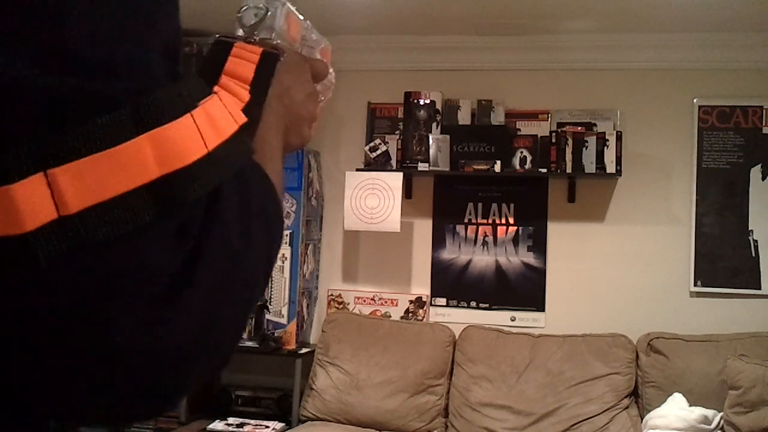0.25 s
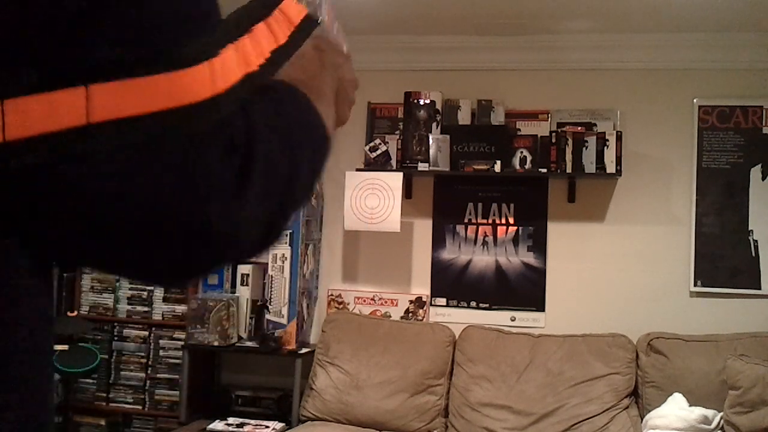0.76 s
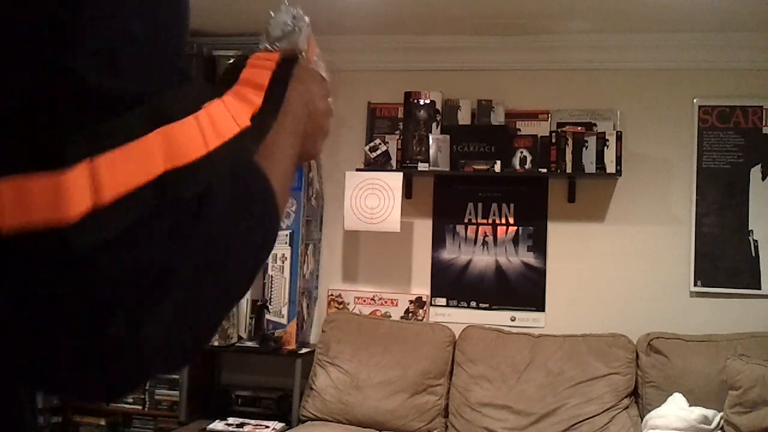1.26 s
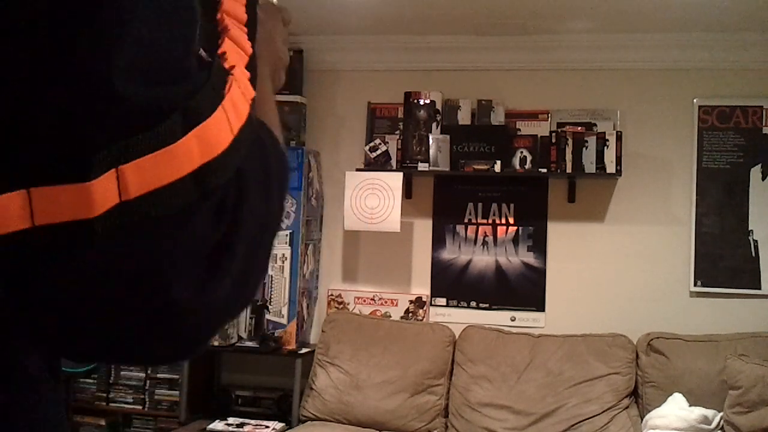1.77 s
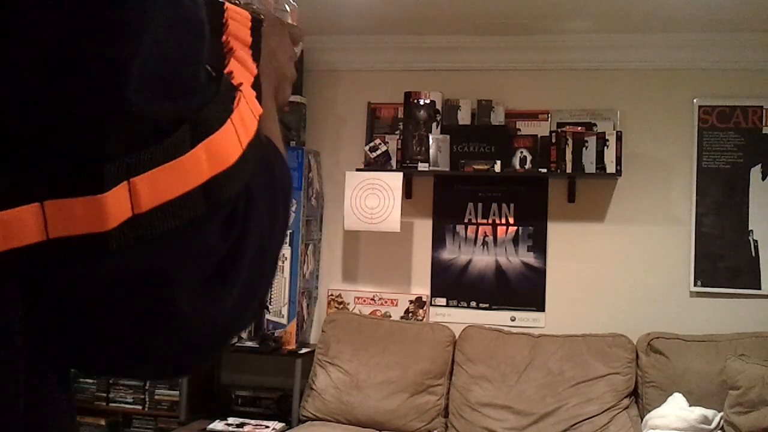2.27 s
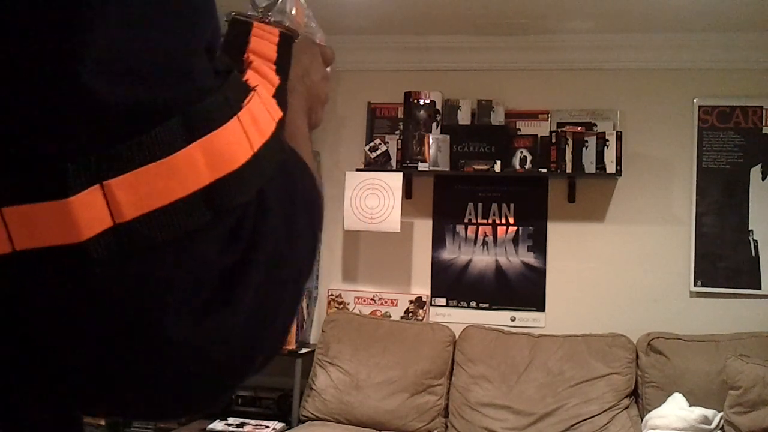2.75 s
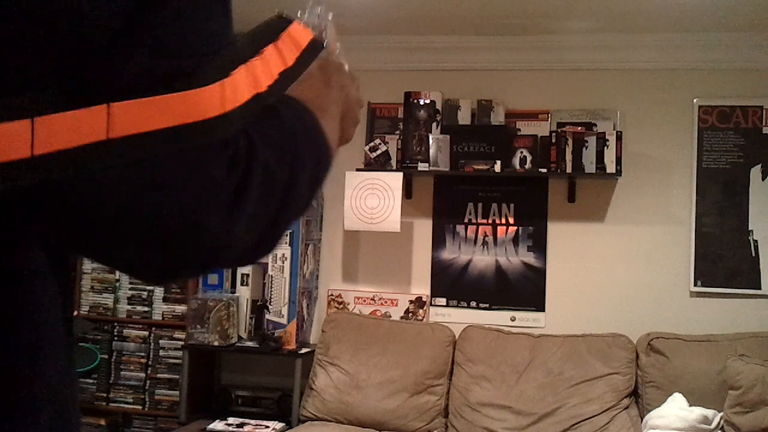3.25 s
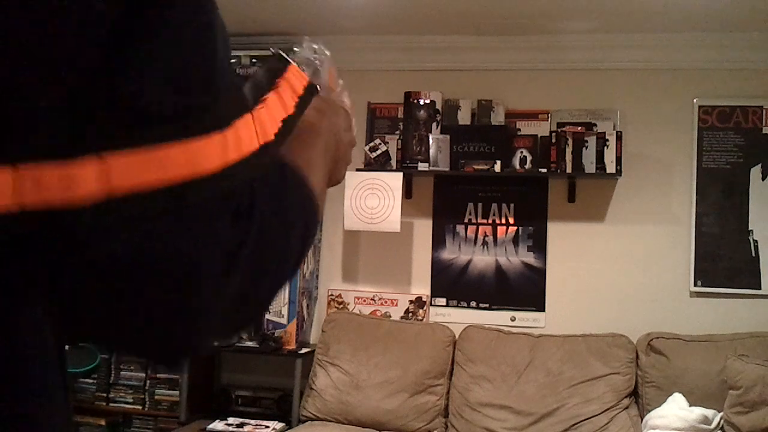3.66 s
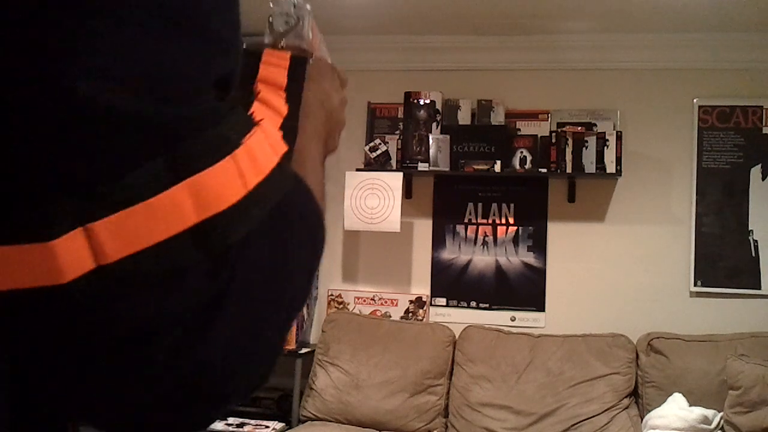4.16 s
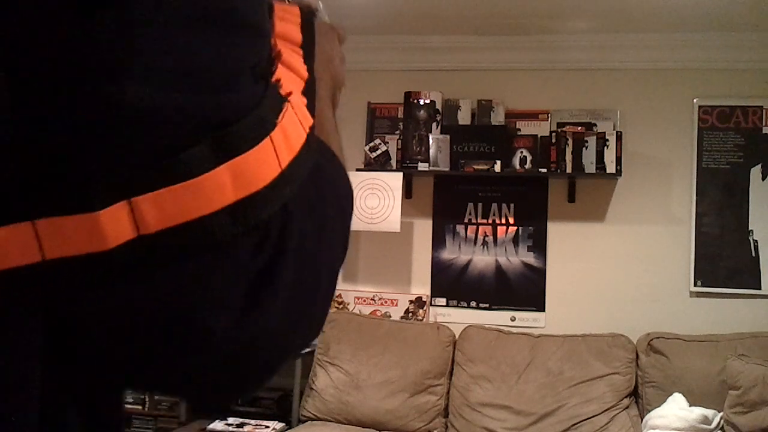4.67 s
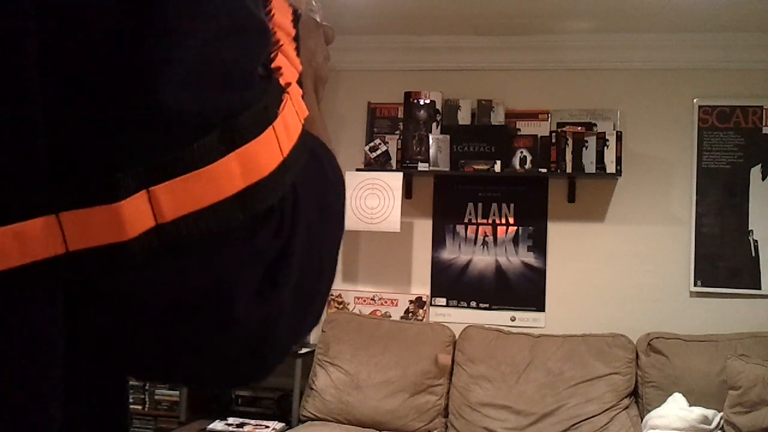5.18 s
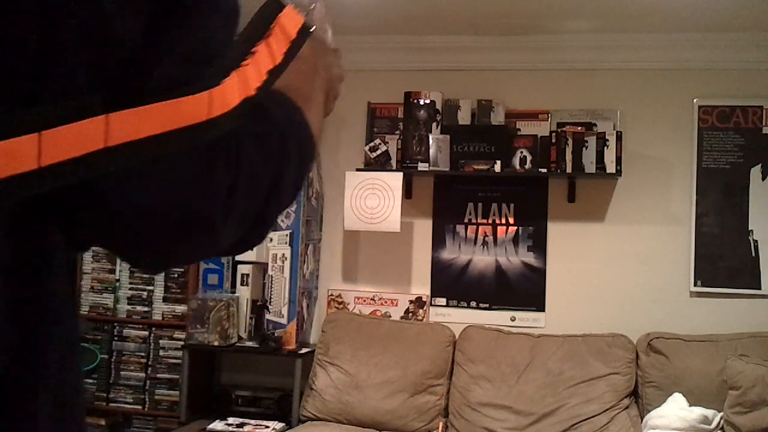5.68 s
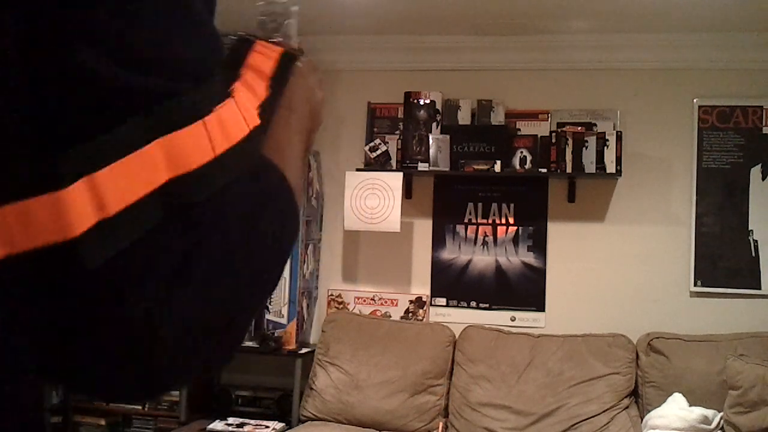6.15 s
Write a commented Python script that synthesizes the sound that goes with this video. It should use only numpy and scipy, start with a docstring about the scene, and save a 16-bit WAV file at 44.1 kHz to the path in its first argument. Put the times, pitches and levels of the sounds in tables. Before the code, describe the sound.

Very close to the microphone in a living room, a toy dart blaster's plastic slide scrapes back, clacks, latches and knocks home. Two loud, distorted snaps with a hollow pop follow, then another priming, two more shots and a third priming. Small ticks and handling knocks fill the gaps over steady faint hiss and low rumble.

```python
"""Close by in a living room, a small knock sounds and a grip shifts, then a spring-powered toy dart blaster is
primed: the slide scrapes back, clacks, latches the plunger and is pushed home. Two shots follow, a second
priming, two more shots and a third priming, with small knocks and ticks between. Blows are impacts and dying
chatter filtered by the plastic shell and a short room; scrapes are runs of tiny slips; each shot adds a ringing
barrel of air. Steady hiss and faint rumble lie underneath, and the shots overload the microphone."""
import sys
import numpy as np
from scipy import signal
from scipy.fft import rfft, irfft
from scipy.io import wavfile
from scipy.ndimage import uniform_filter1d

SR = 44100
rng = np.random.default_rng(int(sys.argv[2]) if len(sys.argv) > 2 else 0)


def unload_audio(sound):
    """Save the sound as a 16-bit wav file, at the path given as the first command line argument."""
    columns = np.transpose(np.atleast_2d(sound))
    # keep every value between -1 and 1, then stretch to whole-number steps
    steps = np.round(np.clip(columns, -1, 1) * 32767)
    wavfile.write(sys.argv[1], SR, steps.astype(np.int16))


N = 283122
SIZE = 2 ** 14   # samples in one blow with its tail
AGE = np.arange(SIZE) / SR   # seconds since the blow
HZ = np.maximum(np.arange(SIZE // 2 + 1) * SR / SIZE, 1)   # frequency of each spectrum bin

# In every table below, a colour is the relative spectrum of a part and its modes stand out of that colour.

# plunger slams: (time [s], level [dB], treble [dB], barrel pop [dB], rattle decay [s],
#                 trigger let go at [s], drag of the trigger [dB])
SHOTS = [(2.076, -6.5, 1, -19, 0.0077, 2.25, -6), (2.480, 1.5, 2.5, -9.5, 0.006, 2.63, -1.5),
         (4.397, -3.5, 1, -3, 0.007, 4.555, 2.5), (4.931, -2.5, 1.5, -13.5, .013, 5.165, 1)]
# broad colour of a slam: (frequency [Hz], level [dB])
SHOT_COLOUR = [(30, -19), (150, -21.5), (280, -12), (480, -13), (850, -9), (1700, -10.5), (2400, -10),
               (3800, -10.5), (5000, -5), (6500, -9.5), (8000, -17.5), (10000, -43)]
# shell resonances under a slam: (frequency [Hz], width [Hz], lift [dB])
SHOT_MODES = [(735, 71, 4.7), (1145, 70, 3.3), (2410, 210, 5.9), (2680, 60, 2.7), (3290, 170, 8.8),
              (4480, 120, 2.4), (4840, 1400, 5.2)]


def shots():
    """The plunger slams home, the spring rattles and the air pops in the barrel as the dart leaves."""
    out = np.zeros(N)
    body = body_db(SHOT_COLOUR, SHOT_MODES)
    for s, level_db, treble_db, pop_db, rattle_s, *_ in SHOTS:
        response_db = body + shelves_db(0, treble_db)
        add(out, s, from_db(pop_db) * barrel_pop())
        add(out, s, from_db(level_db) * blow(response_db, rattle_s, first_db=-11.0))
    return out


BARREL_HZ, BARREL_WIDTH_HZ = 472.7, 67


def barrel_pop(puff_s=0.00035, puff_db=-30, wet_db=-7.0):
    """A puff leaves the muzzle and the air column behind it rings briefly; close, so mostly dry."""
    column = np.sin(2 * np.pi * BARREL_HZ * AGE) * np.exp(-np.pi * BARREL_WIDTH_HZ * AGE)
    puff = AGE / puff_s * np.exp(1 - AGE / puff_s)   # peaks at 1 after puff_s
    pop = column + from_db(puff_db) * puff
    wet = signal.fftconvolve(pop, room())[:SIZE]
    return pop + from_db(wet_db) * wet


# trigger blows: (time [s], level [dB], bass [dB], treble [dB], rattle decay [s])
TRIGGER = [(2.072, -11.5, -1.5, -1.5, 0.0016), (2.344, -11, -4, -4.5, 0.0037), (2.476, -15.5, 8, -7, .003),
           (4.392, -14.5, 5.5, -4, 0.0032), (4.928, -10.5, 10, -1, 0.0026), (5.263, -13, 6, 3, 0.004)]
# broad colour of the trigger: (frequency [Hz], level [dB])
TRIGGER_COLOUR = [(29, -59), (50, -30.5), (119, -44), (311, -12), (790, -9.5), (861, -6.5), (1590, -8.5),
                  (2010, -7.5), (2240, -3.5), (3570, -5), (4910, 0), (8000, -11.5), (10400, -31.5),
                  (17600, -120)]
# trigger resonances: (frequency [Hz], width [Hz], lift [dB])
TRIGGER_MODES = [(392, 48, 3), (522, 58, 9.2), (1353, 180, 5.5), (2210, 63, 2), (4400, 260, 4.6),
                 (5160, 98, 7.2), (7500, 140, 1.3)]


def trigger():
    """The trigger clacks, exciting the shell's resonances and a short rattle."""
    return clacks(TRIGGER, TRIGGER_COLOUR, TRIGGER_MODES, variety_db=3.0)


# slide hitting its back stop: (time [s], level [dB], bass [dB], treble [dB], rattle decay [s])
SLIDE_BACK = [(0.9331, -16.5, 2.5, -2.5, 0.001), (3.3813, -15, 0.5, -2.5, 0.0015),
              (5.74, -16, 2, -1.5, 0.002)]
# broad colour of the back stop: (frequency [Hz], level [dB])
BACK_COLOUR = [(29, -59.5), (50, -27), (279, -38.5), (317, -52), (563, -20), (861, -18), (1130, -8),
               (1320, -20), (2830, -16.5), (4050, -6), (5010, 4), (8000, -19.5), (10400, -41),
               (17600, -120)]
# back stop resonances: (frequency [Hz], width [Hz], lift [dB])
BACK_MODES = [(560, 60, 2), (1240, 110, 0), (1644, 230, 8), (3430, 250, 5.5), (5200, 500, -5)]


def slide_back():
    """The slide clacks against its back stop with the same resonances each time."""
    return clacks(SLIDE_BACK, BACK_COLOUR, BACK_MODES, variety_db=0.0)


# plunger latching: (time [s], level [dB], bass [dB], treble [dB], rattle decay [s])
LATCH = [(1.042, -13.5, 0.5, -2.5, 0.0018), (3.5445, -14, -0.68, -3, 0.0013),
         (5.883, -11, 2.3, 4.5, 0.0014)]
# broad colour of the latch: (frequency [Hz], level [dB])
LATCH_COLOUR = [(29, -72.5), (50, -28), (338, -22), (539, -13), (587, -11), (1040, -18), (1660, -7),
                (2010, -11.5), (3350, -2), (4050, -4), (5010, -2), (8000, -14), (10400, -40.5),
                (17600, -120)]
# latch resonances: (frequency [Hz], width [Hz], lift [dB])
LATCH_MODES = [(778, 160, 6.4), (1330, 300, 10.5), (1650, 140, 8), (3400, 380, 4.6), (4470, 260, 4.5),
               (5200, 400, 8.7), (7000, 690, 8.6)]


def latch():
    """The plunger snaps into its latch and sets the shell ringing."""
    return clacks(LATCH, LATCH_COLOUR, LATCH_MODES, variety_db=1.5)


# knocks of the slide coming home: (time [s], level [dB], bass [dB], treble [dB], rattle decay [s])
SLIDE_HOME = [(1.373, -24.5, 3.5, -1, 0.006), (1.417, -31, 3, 5, 0.0058), (1.452, -37, -11, -3, 0.0038),
              (3.818, -30.5, -3.5, -4, 0.0036), (3.8475, -14.5, -3, -1, 0.0023),
              (3.881, -19, -10, 0.0, 0.0039), (6.168, -31.5, 1, 0, 0.002),
              (6.2064, -22.0, 4.5, 1.5, 0.0028), (6.225, -30.5, 0, -5, 0.0043)]
# broad colour of the front stop: (frequency [Hz], level [dB])
HOME_COLOUR = [(29, -74), (50, -34), (262, -15.5), (298, -17.5), (409, -7), (600, -0.5), (1180, -0.5),
               (1810, -6.5), (2140, -2), (3350, -4), (3650, -4.5), (5340, -3), (8000, -17.5), (10400, -55),
               (17600, -120)]
# front stop resonances: (frequency [Hz], width [Hz], lift [dB])
HOME_MODES = [(423, 180, 10.6), (1220, 145, 3.3), (2280, 120, 1.7), (3340, 330, 9.3), (4330, 350, 3.8),
              (5000, 200, 4.3)]


def slide_home():
    """The slide comes home in a cluster of hollow knocks."""
    return clacks(SLIDE_HOME, HOME_COLOUR, HOME_MODES, variety_db=3.5)


def front_stop_s(latch_s):
    """The slide is home at the hardest of the knocks that follow the latch."""
    knocks = [(level_db, s) for s, level_db, *_ in SLIDE_HOME if 0 < s - latch_s < 1]
    return max(knocks)[1]


# broad colour of lightly touched plastic, shared by spring, strokes and ticks: (frequency [Hz], level [dB])
TICK_COLOUR = [(29, -56), (50, -26), (168, -27.5), (256, -11), (475, -5), (1180, -5), (1630, -4),
               (1810, -7), (3350, -7), (3800, -6.5), (5120, 0), (8000, -23), (10400, -50), (17600, -120)]
# resonances of lightly touched plastic, for strokes and ticks: (frequency [Hz], width [Hz], lift [dB])
TICK_MODES = [(487, 180, 3), (1290, 46, 2.2), (3250, 190, 5.9), (4860, 400, 2)]

# the spring sings as it is rubbed: (time [s], level [dB], decay [s])
SPRING = [(0.713, -50, 0.0026), (5.999, -31.5, 0.015)]
# narrow modes of the coil: (frequency [Hz], width [Hz], lift [dB])
SPRING_MODES = [(3440, 140, 16), (4480, 108, 13), (5106, 170, 20.7)]


def spring():
    """Stick and slip keep the spring's narrow modes singing for a moment."""
    out = np.zeros(N)
    coil = body_db(TICK_COLOUR, SPRING_MODES)
    for s, level_db, length_s in SPRING:
        add(out, s, from_db(level_db) * blow(coil, length_s, first_db=-6.5))
    return out


# primings: (pull starts at [s], drag on the rails [dB])
PRIMINGS = [(0.62, -.5), (3.06, -1), (5.491, 2)]
# hollow ring of the forward run: (frequency [Hz], width [Hz], lift [dB])
PUSH_MODES = [(450, 200, 2.5), (1200, 400, 5.5)]
# strokes of plastic on plastic: (first level [dB], last level [dB], bass [dB], treble [dB]), drag comes on top
PULL = (-51, -49, 2.5, -3)   # the slide runs back along its rails, up to the stop
CATCH = (-42, -37, -0.5, -3)   # at the end of that run it rides over the catch
REGRIP = (-53, -51, -1.5, -5.5)   # the hand changes direction after the latch
PUSH = (-43.5, -38.5, -0.5, -3.5)   # the slide runs forward, gathering speed
SEAT = (-33, -49, 2.5, -3)   # and beds in after it has come home
SQUEEZE = (-53, -36, -2, 2)   # the trigger drags the sear up to the shot
LET_GO = (-44.5, -50, -1, -1.5)   # the trigger slides back after the shot
SHIFT = (-47, -37, -4.5, 2.5)   # the grip shifts once before the first priming
# stroke lengths in seconds
CATCH_S, REGRIP_S, PUSH_S, SEAT_S = .054, 0.1, .08, .1
SQUEEZE_S, LET_GO_S, SHIFT_S = .08, 0.11, 0.111
REGRIP_AFTER_S, SHIFT_AT_S = .14, .1   # pause after the latch; time of the grip shift


def rubbing():
    """Strokes lead up to each blow of the slide and each shot, and follow it."""
    out = stroke(SHIFT_AT_S, SHIFT_S, SHIFT)
    for (pull_s, drag_db), back_s, latch_s in zip(PRIMINGS, times(SLIDE_BACK), times(LATCH)):
        home_s = front_stop_s(latch_s)
        out += stroke(pull_s, back_s - pull_s, PULL, drag_db)
        out += stroke(back_s - CATCH_S, CATCH_S, CATCH)
        out += stroke(latch_s + REGRIP_AFTER_S, REGRIP_S, REGRIP, drag_db)
        out += stroke(home_s - PUSH_S, PUSH_S, PUSH, modes=PUSH_MODES)
        out += stroke(home_s, SEAT_S, SEAT)
    for shot_s, *_, let_go_s, drag_db in SHOTS:
        out += stroke(shot_s - SQUEEZE_S, SQUEEZE_S, SQUEEZE, drag_db)
        out += stroke(let_go_s, LET_GO_S, LET_GO, drag_db)
    return out


def stroke(start, length_s, shape, drag_db=0, modes=(), slips_per_s=150, uneven_db=3.5):
    """One stroke is a run of tiny uneven slips of plastic on plastic, heard through the shell."""
    first_db, last_db, bass_db, treble_db = shape
    out = np.zeros(N)
    shell = body_db(TICK_COLOUR, [*TICK_MODES, *modes])
    progress = AGE / max(length_s, .01)
    moving = progress < 1
    sizes = from_db(uneven_db * np.minimum(rng.exponential(1, SIZE), 3))
    sizes = sizes * rng.choice([-1, 1], SIZE)
    slips = sizes * (rng.random(SIZE) < slips_per_s / SR) * moving
    slips = slips / np.sqrt(np.mean(slips[moving] ** 2) + 1e-20)
    pressure = from_db(drag_db + np.interp(progress, [0, 1], [first_db, last_db]))
    response_db = shell + shelves_db(bass_db, treble_db) + spot_db(3.0)
    path = signal.fftconvolve(ringing(response_db), room())[:SIZE]
    path = rms_one(path) / np.sqrt(SIZE)   # unit energy
    add(out, start, signal.fftconvolve(slips * pressure, path))
    return out


# a knock at the very start (first row), then clear knocks of the grip, trigger and gears: # (time [s], level
# [dB], bass [dB], treble [dB])
TICKS = [(0.001, -39.5, -1, 1.5), (0.113, -40.5, -1, 3.5), (0.16, -34, -2, 9.5), (0.591, -50.5, 13, 2),
         (0.714, -40, -4, 14), (0.881, -43, 0.5, -7), (1.183, -42.5, -8.5, -11), (1.322, -34.5, 4, -3),
         (1.553, -45.5, 16, -5), (1.629, -47.5, 5, -9.5), (1.705, -40, -8, -6.5), (2.019, -41, -6, -7),
         (2.25, -41.5, -6, 3), (2.3, -30.5, -8.5, -2), (2.634, -33, -2.5, 5), (2.654, -36, -1, 1),
         (3.04, -40.5, 7, 6), (3.296, -35, 25.5, -5.5), (3.71, -42.5, -0.5, -0.5), (4.578, -30, 2, 7.5),
         (4.603, -33.5, 3, 4), (4.831, -33, 13, 7), (4.888, -34, -5.5, -0.5), (5.156, -31, -11, 0),
         (5.485, -43.5, 6, 6.5), (6.04, -37, -8, -4.5), (6.402, -40.5, 5, -3.5)]
TICK_RATTLE_S = .0017
# faint ticks of loose parts, while the slide is pulled and while the first two shots are aimed and fired
FIRST_SHOTS_S = (1.82, 2.8)   # start and end
LOOSE_PER_S, LOOSE_SPREAD_DB = 13, 3
LOOSE_PULL_DB, LOOSE_SHOTS_DB = -48, -54   # middle levels; drag is added to the pull's


def handling():
    """The clear knocks and the faint ticks between them, all with the same short rattle."""
    rows = list(TICKS) + loose_ticks(*FIRST_SHOTS_S, LOOSE_SHOTS_DB)
    for (pull_s, drag_db), back_s in zip(PRIMINGS, times(SLIDE_BACK)):
        rows += loose_ticks(pull_s, back_s, LOOSE_PULL_DB + drag_db)
    rattling = [(*row, TICK_RATTLE_S) for row in rows]
    return clacks(rattling, TICK_COLOUR, TICK_MODES, variety_db=3.0)


def loose_ticks(start, end, level_db):
    """Loose parts tick at uneven intervals and with uneven force: rows like those of TICKS."""
    slot_s = 1 / LOOSE_PER_S
    rows = []
    for s in np.arange(start, end - slot_s, slot_s):
        tick_s = s + rng.random() * slot_s
        tick_db = level_db + LOOSE_SPREAD_DB * rng.standard_normal()
        rows.append((tick_s, tick_db, 0, 0))
    return rows


# relative spectrum of the room's steady background: (frequency [Hz], level [dB])
FLOOR = [(15, -51), (25, -23.5), (101, -21), (132, -12), (185, -13), (315, -15), (382, -8.5), (411, -14),
         (442, -6.5), (562, -15), (789, -13.5), (1030, -18), (8000, -24.5), (10400, -56), (17600, -120)]
FLOOR_DB = -59   # rms


def background():
    """Steady hiss and faint rumble of the room, as noise shaped by one fixed spectrum."""
    white = rng.standard_normal(N + SIZE - 1)
    noise = signal.fftconvolve(white, ringing(at_hz(FLOOR, HZ)), "valid")
    return from_db(FLOOR_DB) * rms_one(noise)


# how long the room rings: (frequency [Hz], time to fall by 60 dB [s])
ROOM_T60 = [(100, 0.1765), (500, 0.2248), (1500, 0.2029), (5000, 0.2443), (8000, 0.2113)]
CEILING_S, CEILING_DB, TAIL_DB = .0038, 2.5, 2.4897   # levels against the direct sound


def room(build_s=0.0012, scatter_s=0.0016):
    """Sound scattered round the player's body, a ceiling echo, then a diffuse tail dying by band."""
    edges = np.geomspace(40, 12000, 7)
    tail = np.zeros(SIZE)
    for low, high in zip(edges, edges[1:]):
        bandpass = signal.butter(2, [low, high], "band", fs=SR, output="sos")
        band = signal.sosfilt(bandpass, rng.standard_normal(SIZE))
        tail += band * 1000 ** (-AGE / at_hz(ROOM_T60, np.sqrt(low * high)))
    tail *= 1 - np.exp(-(AGE / build_s) ** 2)
    direct, ceiling = (scattered(scatter_s) for _ in range(2))
    echo = from_db(CEILING_DB) * np.roll(ceiling, int(CEILING_S * SR))
    return (direct + echo + from_db(TAIL_DB) * rms_one(tail)) / np.sqrt(SIZE)


def scattered(scatter_s):
    """A dense burst of tiny reflections that dies away exponentially."""
    burst = rng.standard_normal(SIZE) * np.exp(-AGE / scatter_s)
    return rms_one(evened(burst, 660))


def clacks(table, colour, modes, variety_db):
    """All blows on one part of the mechanism, each landing on its own spot of the shell."""
    out = np.zeros(N)
    body = body_db(colour, modes)
    for s, level_db, bass_db, treble_db, rattle_s in table:
        response_db = body + shelves_db(bass_db, treble_db) + spot_db(variety_db)
        add(out, s, from_db(level_db) * blow(response_db, rattle_s))
    return out


def blow(response_db, rattle_s, contacts_per_s=1300, first_db=-4.5):
    """An impact and a dying chatter of loose parts, through shell and room; loudest moment has rms 1."""
    contacts = rng.standard_normal(SIZE) * (rng.random(SIZE) < contacts_per_s / SR)
    chatter = contacts * np.exp(-AGE / max(rattle_s, 1e-4))
    chatter = rms_one(chatter) / np.sqrt(SIZE)   # unit energy
    chatter[0] += from_db(first_db)
    shell = signal.fftconvolve(evened(chatter), ringing(response_db))[:SIZE]
    sound = signal.fftconvolve(shell, room())[:SIZE]
    power = uniform_filter1d(sound ** 2, size=353, mode="constant")   # over 8 ms
    return sound / np.sqrt(power.max())


def body_db(colour, modes):
    """Response of a plastic part: broad colour plus resonances."""
    return at_hz(colour, HZ) + sum(lift_db(*mode) for mode in modes)


def lift_db(hz, width_hz, db):
    """The bump that one resonance adds to a spectrum."""
    return db / (1 + (2 * (HZ - hz) / width_hz) ** 2)


def shelves_db(bass_db, treble_db, bass_hz=800, treble_hz=2800):
    """Heavy contacts bring out the bass of the shell, hard ones its treble."""
    bass = bass_db / (1 + (HZ / bass_hz) ** 4)
    treble = treble_db / (1 + (treble_hz / HZ) ** 4)
    return bass + treble


def spot_db(spread_db=3.5, relative_width=0.044, count=22):
    """Every spot on the shell favours some of its many modes and misses others."""
    pitches = np.geomspace(300, 7500, count) * np.exp(rng.normal(0, .05, count))
    return sum(lift_db(hz, relative_width * hz, spread_db * rng.standard_normal()) for hz in pitches)


def evened(x, even_hz=130):
    """Keep the timing of a burst but spread its force evenly over the spectrum; unit energy."""
    force = uniform_filter1d(np.abs(rfft(x)) ** 2, int(even_hz * SIZE / SR) + 1)
    inverse_db = -10 * np.log10(np.abs(force) + 1e-9)
    return signal.fftconvolve(x, ringing(inverse_db))[:SIZE]


def ringing(response_db):
    """Causal (minimum-phase) impulse response with this spectrum."""
    cepstrum = irfft(np.log(from_db(response_db) + 1e-9))
    cepstrum[1:SIZE // 2] *= 2   # fold the part before time zero onto the part after it
    cepstrum[SIZE // 2 + 1:] = 0
    return irfft(np.exp(rfft(cepstrum)))


def at_hz(points, hz):
    """Read a table on a log-frequency axis."""
    knots, values = np.transpose(points)
    return np.interp(np.log(hz), np.log(np.abs(knots)), values)


def from_db(db):
    """Decibels to gain."""
    return 10 ** (np.asarray(db) / 20)


def rms_one(x):
    """Scale to unit rms."""
    return x / np.sqrt(np.mean(x ** 2) + 1e-20)


def times(table):
    """When the blows of a table fall."""
    return [row[0] for row in table]


def add(track, s, sound):
    """Mix a sound in at a time."""
    start = int(np.clip(round(s * SR), 0, N - 1))
    track[start:start + len(sound)] += sound[:N - start]


def scene():
    """Firing, priming and handling over the quiet room."""
    firing = shots() + trigger()
    priming = slide_back() + latch() + slide_home()
    touches = spring() + rubbing() + handling()
    return (firing + priming + touches + background())[None]


MIC_EDGE_HZ, CUTOFF_HZ = 8300, 16300
OVERLOAD = .73   # amplitude where clipping sets in


def record(dry, limit_db=3.0, release_db_per_s=900, attack_s=.0008):
    """A narrow-band microphone, a fast limiter whose overshoots clip, then the top is cut."""
    mic = signal.cheby1(10, .3, MIC_EDGE_HZ, fs=SR, output="sos")
    heard = signal.sosfilt(mic, dry)
    excess_db = np.maximum(20 * np.log10(np.abs(heard) + 1e-9) - limit_db, 0)
    # hold each peak, letting it fall at the release rate
    recovery = release_db_per_s * np.arange(N) / SR
    held_db = np.maximum.accumulate(excess_db + recovery, axis=-1) - recovery
    pole = np.exp(-1 / (attack_s * SR))
    reduction_db = signal.lfilter([1 - pole], [1, -pole], held_db)
    limited = heard * from_db(-reduction_db)
    clipped = limited / (1 + (limited / OVERLOAD) ** 12) ** (1 / 12)
    rounded = signal.sosfiltfilt(signal.butter(2, 14000, fs=SR, output="sos"), clipped)
    top_cut = signal.ellip(8, .05, 60, CUTOFF_HZ, fs=SR, output="sos")
    return signal.sosfiltfilt(top_cut, rounded)


dry = scene()
out = record(dry)
unload_audio(out)
```